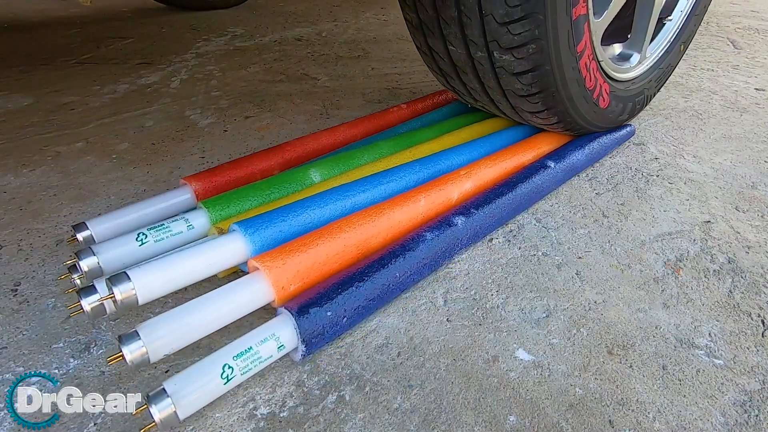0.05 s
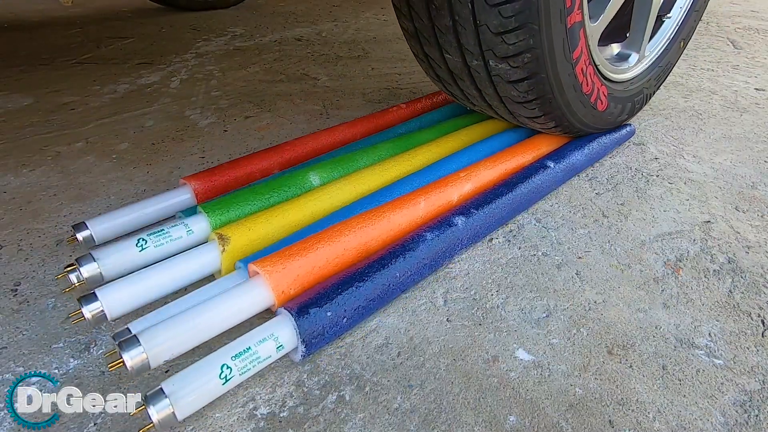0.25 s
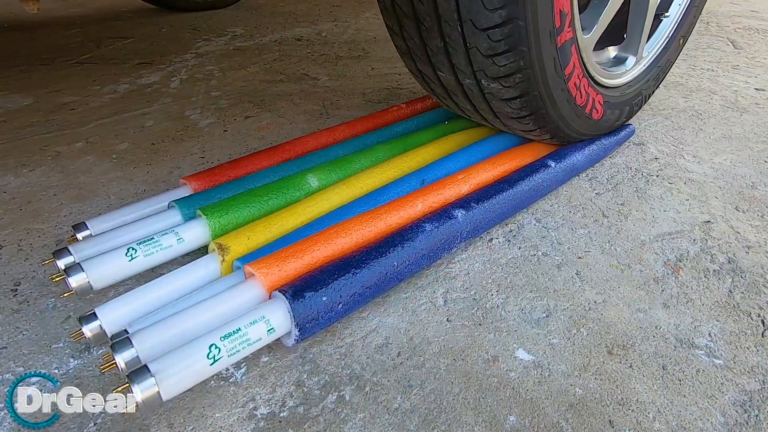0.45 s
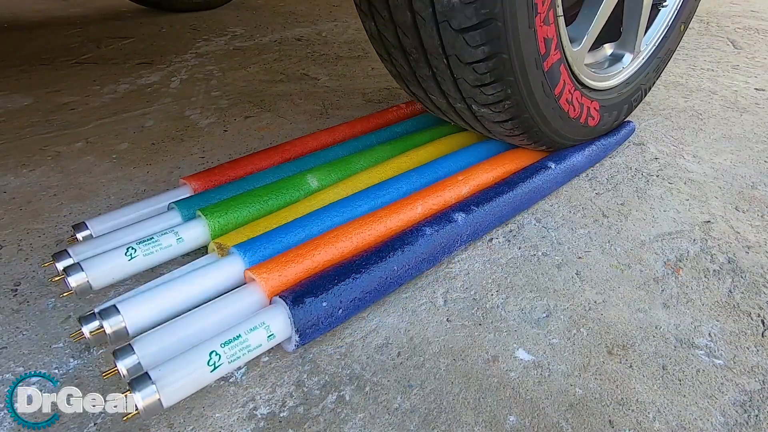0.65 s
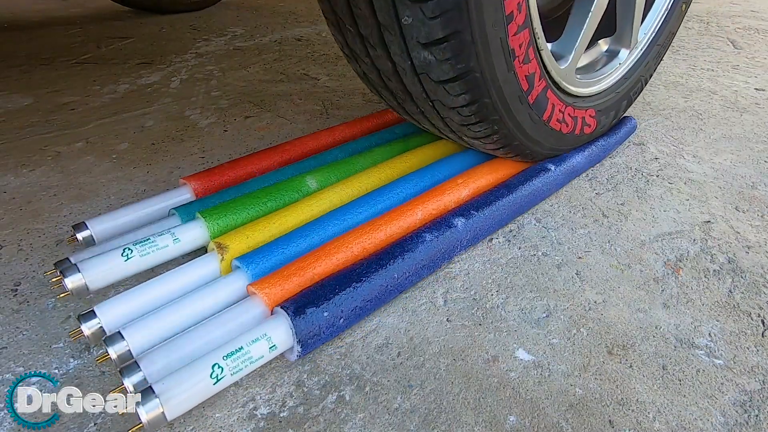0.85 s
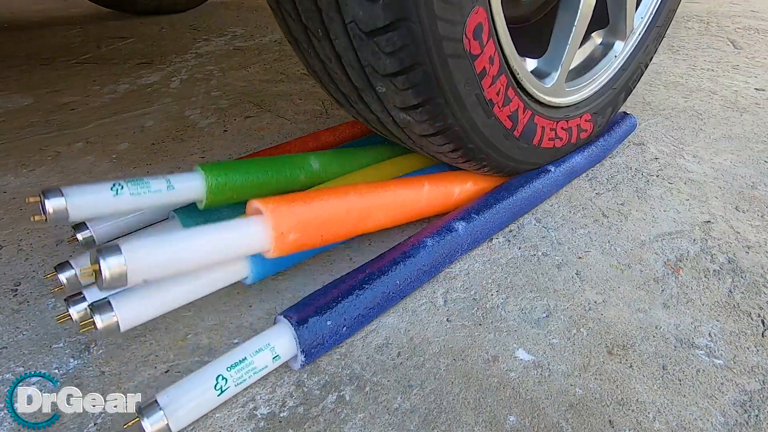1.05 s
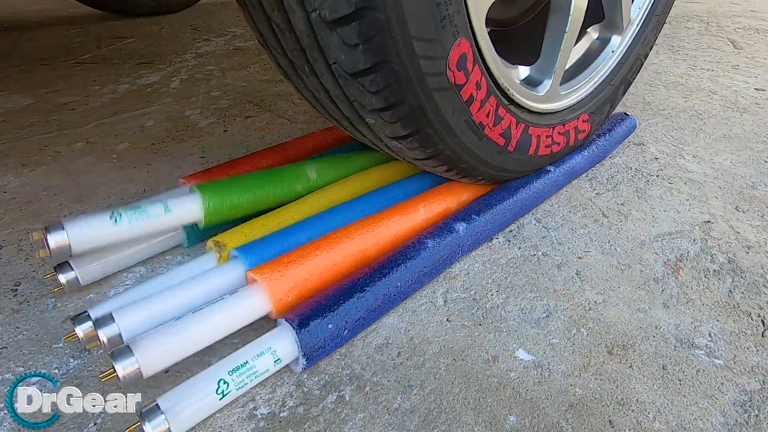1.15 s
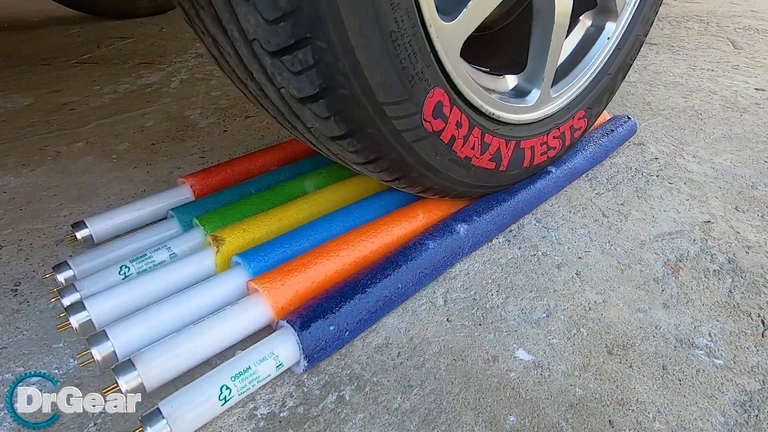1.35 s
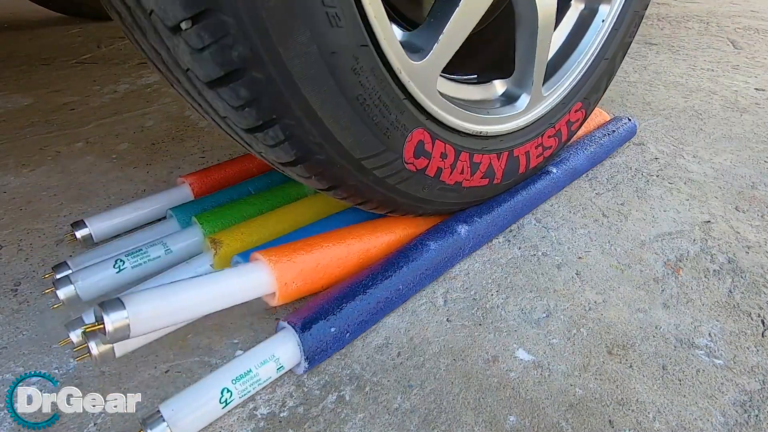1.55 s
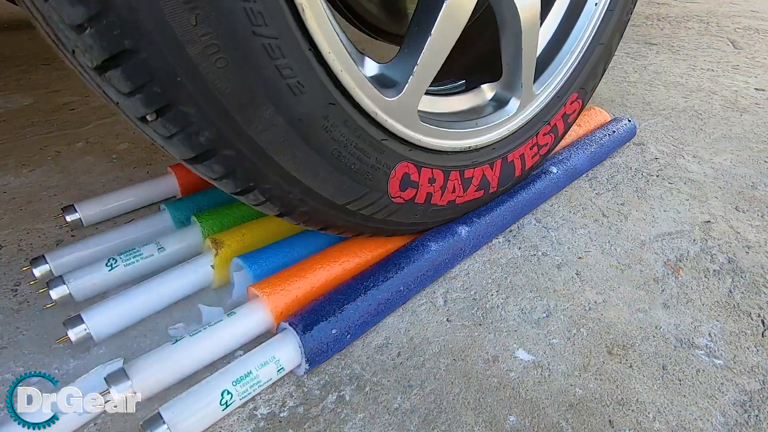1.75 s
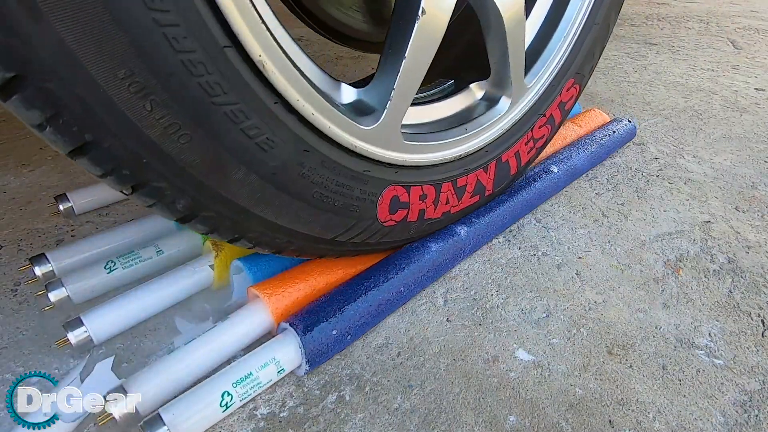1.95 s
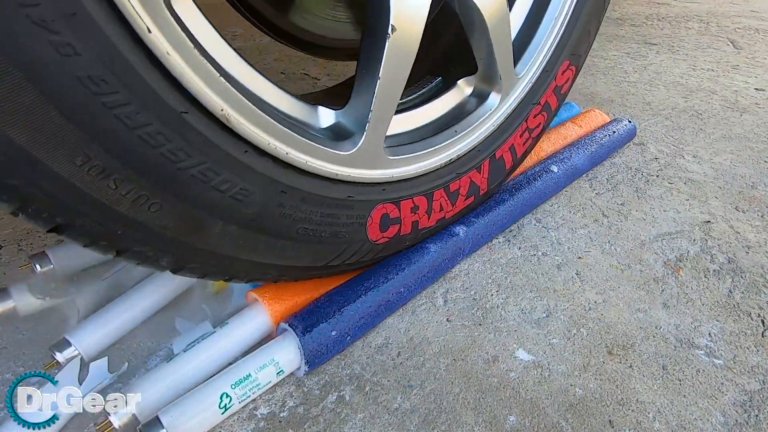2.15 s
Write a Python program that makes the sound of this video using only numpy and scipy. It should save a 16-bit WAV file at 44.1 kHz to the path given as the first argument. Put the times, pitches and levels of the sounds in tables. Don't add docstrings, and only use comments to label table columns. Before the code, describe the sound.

Glass tubes being crushed by a car tyre on concrete, very close and dry. An idling engine hums, then distorted pops burst at 0.2 and 0.4 s with splinters and a hollow tyre hum. Near quiet follows; from 0.75 s, cracks and brief glassy rings thicken into dense crunching, grinding and hollow knocks from 1.0 to 1.65. The loudest burst hits at 1.7, then sparse knocks and ticks until 2.2.

```python
import sys
import numpy as np
from scipy import signal
from scipy.io import wavfile
from scipy.ndimage import uniform_filter1d

SR = 44100
rng = np.random.default_rng(int(sys.argv[2]) if len(sys.argv) > 2 else 0)


def linear_from_db(decibels):
    return 10 ** (np.asarray(decibels, float) / 20)


def output_pcm(signal):
    pcm = np.clip(np.atleast_2d(signal).T, -1, 1) * 32767
    wavfile.write(sys.argv[1], SR, np.round(pcm).astype(np.int16))


N = 97020


def in_time(rows):
    s, *columns = np.transpose(rows)
    return [np.interp(np.arange(N) / SR, s, c) for c in columns]


def coloured(x, points):
    hz, db = np.transpose(points)
    f = np.geomspace(60, SR / 2, 200)
    gain = linear_from_db(np.interp(np.log(f), np.log(hz), db, left=-50, right=-60))
    power = np.r_[0, gain] ** 2 + 1e-7
    taps = signal.minimum_phase(signal.firwin2(1023, np.r_[0, f], power, fs=SR))
    return signal.fftconvolve(x, taps / np.sqrt(np.sum(taps ** 2)))[:len(x)]


def ring(x, hz, t60):
    r, w = linear_from_db(-60 / (t60 * SR)), 2 * np.pi * hz / SR
    return signal.lfilter([0, np.sin(w)], [1, -2 * r * np.cos(w), r * r], x + 1e-18)


def band(x, order, hz, kind):
    return signal.lfilter(*signal.butter(order, hz, kind, fs=SR), x)


def unit(x):
    return x / np.max(np.abs(x))


def add(out, s, x):
    i = int(s * SR)
    out[i:i + len(x)] += x[:len(out) - i]


def splinters(size, spread):
    x = rng.standard_normal(size) * linear_from_db(spread * np.minimum(rng.exponential(1, size), 4))
    return x / np.std(x)


# (time [s], pop level [dB], settled pitch [Hz], suck of air [full scales],
# splinter level [dB])
IMPLOSIONS = [
    (0.2117, 2.5, 624, -1.17, -6),
    (0.3751, -3, 567, -1.07, -5.5),
    (0.3939, -5, 600, 0.62, -7.5),
    (0.4169, -5.5, 620, -0.23, -10.5),
    (1.6901, 4, 900, -1.226, -28),
    (1.6976, -6, 926, 1.33, -29),
    (1.7053, -4, 1025, -1.3, -45),
]
# (time [s], push [full scales])
SLOSH = [
    (1.7021, -0.86),
    (1.704, 0.68),
    (1.7112, 0.9),
]


def implosions():
    t, out, hits = np.arange(SR // 4) / SR, np.zeros(N), np.zeros(N)
    sweep_hz, sweep_s, pop_cycles, suck_s = 900, 0.00085, 4.06, 0.018
    for s, db, hz, suck, _ in IMPLOSIONS:
        turns = hz * t + sweep_hz * sweep_s * (1 - np.exp(-t / sweep_s))
        boom = linear_from_db(-12) * np.sin(2 * np.pi * 327 * t)
        age = t * hz / pop_cycles
        pop = (np.sin(2 * np.pi * turns) + boom) * np.exp(-age ** 2)
        rough = ring(rng.standard_normal(len(t)), 0.96 * hz, 0.0049)
        pop = pop + linear_from_db(-4) * rough / rough.std() * np.exp(-age / 2.06)
        air = suck * (1 - np.exp(-(t / 0.0042) ** 2)) * np.exp(-t / suck_s)
        add(out, s + 0.00034, linear_from_db(db) * pop + air)
        hits[int(s * SR)] = linear_from_db(db - 24.5)
    for s, push in SLOSH:
        add(out, s, push * (1 - np.exp(-(t / 0.0019) ** 2)) * np.exp(-t / suck_s))
    tyre_hz, tyre_t60_s, swell_s = 232.4, 0.45, 0.016
    hum = ring(hits, tyre_hz, tyre_t60_s) - ring(hits, tyre_hz, swell_s * np.log(1000))
    hum = hum * (1 + .5 * np.sin(2 * np.pi * 23 * np.arange(N) / SR))
    rows = [(s, db, 4500) for s, *_, db in IMPLOSIONS]
    return out + cracks(rows) + hum


# (frequency [Hz], level [dB per Hz])
GLASS = [(880, -19), (1500, -2), (1970, -7), (4760, 0), (6430, -4), (10700, -4.5), (15200, -25),
         (16500, -33)]


def cracks(rows):
    t, burst, rings = np.arange(6000) / SR, np.zeros(N), np.zeros(N)
    crack_s, tail_s, tail_db, own_db, own_cycles = 0.0018, 0.013, -16.5, -6, 47
    shard_db, shard_t60_s = -15.5, 0.036
    for s, db, hz in rows:
        lumps = np.repeat(linear_from_db(2.95 * rng.standard_normal(60)), 100)
        fade = np.exp(-t / crack_s) + lumps * linear_from_db(tail_db) * np.exp(-t / tail_s)
        x = splinters(len(t), spread=1.0) * fade
        x *= 1 - np.exp(-t / 0.00052)
        add(burst, s, linear_from_db(db) * band(x, 1, min(3.9 * hz, SR / 2.5), "low"))
        add(rings, s, linear_from_db(db + own_db) * unit(ring(x, hz, own_cycles / hz)))
        chance = rng.random((4, 2))
        for f, d in zip(2200 * 3 ** chance[:, 0], -10 * chance[:, 1]):
            add(rings, s, linear_from_db(db + d + shard_db) * unit(ring(x, f, shard_t60_s)))
    return coloured(burst, GLASS) + rings


# (time [s], level [dB], ringing pitch [Hz])
CRACKS = [(0.744, -16, 5830), (0.7893, -11, 3060), (0.8914, -15, 4530), (0.9291, -24.5, 2700),
          (0.979, -7.5, 5080), (0.9878, -9.5, 2790), (1.0491, -23, 3010), (1.0588, -6.5, 3160),
          (1.0687, -14, 2570), (1.0961, -19, 7200), (1.1076, -5, 5630), (1.1252, -5.5, 9700),
          (1.1357, -6, 2590), (1.1467, -21, 3480), (1.2062, -25, 4240), (1.2179, -9.5, 5940),
          (1.2291, -18, 3220), (1.2562, -18, 4050), (1.2644, -11, 2740), (1.2742, -19, 3500),
          (1.2839, -11.5, 7200), (1.3029, -14.5, 4650), (1.3078, -9, 4730), (1.3342, -7.5, 4100),
          (1.3688, -39, 2810),
          (1.378, -22, 2450), (1.3932, -20, 4430), (1.4031, -25, 4360), (1.4292, -19.5, 4500),
               (1.4473, -14, 4370), (1.461, -18, 4130), (1.468, -18, 2900), (1.4872, -11, 4200),
               (1.5064, -41, 3240), (1.5255, -14.5, 3450), (1.5388, -7, 5570), (1.5781, -9.5, 5100),
               (1.591, -3.5, 5400), (1.5943, -16, 5800), (1.6093, -13, 4870), (1.625, -11, 6070),
               (1.641, -35, 6900), (1.657, -13.5, 3750), (1.6675, -17, 5960), (1.8244, -24, 5070),
               (1.858, -16, 3060), (1.9793, -20.5, 5130), (2.0731, -15, 4600), (2.0946, -16, 3450),
               (2.1471, -17, 5500), (2.1928, -16, 6300)]


def crushed_glass():
    return cracks(CRACKS)


def knocks(rows):
    t, out = np.arange(4000) / SR, np.zeros(N)
    knock_s, cycles, tail_s, tail_db = 0.0016, 5.3, 0.0094, -19
    pressed_s, thud_hz, thud_db = 1.0, 85.5, -23.5
    for s, db, hz in rows:
        fade = 0.31 * np.exp(-t / knock_s) + linear_from_db(tail_db) * np.exp(-t / tail_s)
        x = rng.standard_normal(len(t)) * fade
        x[0] += 3.0
        y = ring(x, hz, cycles / hz) + .5 * ring(x, 1.566 * hz, cycles / hz)
        if pressed_s < s < IMPLOSIONS[-1][0]:
            add(out, s, linear_from_db(db + thud_db) * np.sin(2 * np.pi * thud_hz * t) * np.exp(-t / 0.005))
        add(out, s, linear_from_db(db) * unit(band(y, 2, [0.54 * hz, 2600], "band")))
    return out


# (time [s], level [dB], pitch [Hz])
KNOCKS = [(0.7438, -14.5, 1850), (0.8923, -18.5, 547), (0.9789, -12.5, 774), (1.0253, -21, 830),
          (1.0585, -40, 1040), (1.0688, -11, 850), (1.0965, -13, 796), (1.1075, -9, 1160),
          (1.1148, -6, 1430), (1.1262, -9, 960), (1.1356, -8.5, 870), (1.147, -0.5, 980),
          (1.1897, -24, 750), (1.2291, -9.5, 1050), (1.237, -13, 1050), (1.257, -11, 592.4),
          (1.2685, -9, 980), (1.2761, -15.5, 1000), (1.2839, -12, 700), (1.3007, -11.5, 970),
          (1.3074, -30, 1730), (1.3344, -5.5, 1380), (1.379, -2.5, 1380), (1.3829, -9.5, 630),
          (1.3945, -10.5, 640), (1.4376, -18.5, 674),
          (1.447, -13, 1320), (1.4652, -4, 610), (1.4873, 2.5, 960), (1.4986, -12, 1054),
               (1.51, -20, 910), (1.531, -13, 1570), (1.54, -2, 1130), (1.5748, -17, 800),
               (1.5899, -6.5, 1010), (1.6006, -14, 620), (1.6098, -14.5, 890), (1.6263, -12, 686),
               (1.6442, -8.5, 814), (1.6575, -9.5, 900), (1.7623, -13, 840), (1.8342, -25, 665),
               (1.845, -16, 955), (1.8585, -14, 1440), (1.9689, -15.5, 990), (1.9812, -7.5, 970),
               (2.0005, -18.5, 1050), (2.0737, -10, 1650), (2.0879, -13, 1040), (2.095, -9, 750),
               (2.1466, -4, 1120), (2.1933, -9.5, 672)]
# (time [s], peak level [dB])
MORE_KNOCKS = [
    (0.497, -34.5),
    (0.593, -40),
    (0.694, -31.5),
    (0.789, -27),
    (1.144, -1.5),
    (1.768, -20),
]


def crushed_sleeves():
    settling = np.array([(s, db, 750) for s, db in MORE_KNOCKS])
    return knocks(np.vstack([KNOCKS, settling]))


# (time [s], level [dB])
GRIND = [(.68, -86), (.74, -54), (.85, -57.5), (.9, -47), (1.0, -46.5), (1.18, -39.5), (1.3, -34.5),
         (1.42, -38), (1.62, -38), (1.67, -32), (1.78, -46.5), (1.87, -51), (1.93, -57), (2.0, -54.5),
         (2.06, -46.5), (2.2, -44)]


def grinding():
    db, = in_time(GRIND)
    grains_per_s, grain_s, dull_db = 900, 0.0022, 5.5
    born = rng.random((2, N)) < grains_per_s / SR
    born = born * linear_from_db(4.84 * np.minimum(rng.exponential(1, (2, N)), 4))
    dying = signal.lfilter([1], [1, -np.exp(-1 / (grain_s * SR))], born) * rng.standard_normal((2, N))
    bright = coloured(dying[0], GLASS)
    dull = ring(np.diff(dying[1], prepend=0), 1000, 0.0024)
    return linear_from_db(db) * (bright / bright.std() + linear_from_db(dull_db) * dull / dull.std())


# (time [s], level [dB], which tube [0 first, 1 second])
WHOLE_HITS = [
    (0.744, -26.5, 0),
    (0.765, -30.5, 0),
    (0.7885, -30.5, 1),
    (0.8905, -22, 1),
    (0.929, -32, 1),
    (0.959, -37, 1),
    (0.989, -29, 1),
    (1.027, -26, 1),
    (1.0587, -19, 1),
]
# (frequency [Hz], level [dB], time to fall 60 dB [s], held to 0.075 s at
FIRST_TUBE = [(1900, -5, 0.32), (2500, -5.5, 0.39), (2810, -11, 0.071), (3250, -8, 0.29), (3640, -1, 0.096),
              (3960, -10.5, 0.33), (4947, -24, 0.63)]
SECOND_TUBE = [(2340, -4.5, 0.21), (2630, -13, 5.0), (3060, -8.5, 0.13), (3930, -16, 0.14),
               (4410, -1.5, 0.32), (5600, -28, 0.094), (5530, -3, 0.23)]


def whole_tubes():
    t, out = np.arange(6000) / SR, np.zeros(N)
    longest_t60_s, detune_db = .075, .15
    for s, db, tube in WHOLE_HITS:
        for hz, d, t60 in (SECOND_TUBE if tube > .5 else FIRST_TUBE):
            x = rng.standard_normal(len(t)) * (np.exp(-t / 0.0033) + 0.064 * np.exp(-t / 0.014))
            hz = hz * linear_from_db(detune_db * rng.standard_normal())
            level = linear_from_db(db + d + 1.4 * rng.standard_normal())
            add(out, s, level * unit(ring(x, hz, min(t60, longest_t60_s))))
    return out


# (time [s], level [dB], pitch [Hz])
EXTRA_KNOCKS = [(0.345, -35.5, 727), (0.582, -49, 1440), (0.707, -34, 900), (0.765, -26.5, 850),
                (0.947, -26, 698.5), (1.3305, -10, 560), (1.3105, -10.5, 1700), (1.355, -35, 1630),
                (1.47, -22, 800), (1.81, -25.5, 938), (1.883, -21, 850), (1.901, -35, 1000), (2.011, -24, 1020),
                (2.047, -33, 830), (2.146, -18, 454), (2.189, -16, 1050)]


def extra_knocks():
    return knocks(EXTRA_KNOCKS)


# (time [s], level [dB], ringing pitch [Hz])
MORE_CRACKS = [(0.0488, -38, 4920), (0.0957, -36.5, 5360), (0.134, -42, 10500), (0.176, -36.5, 9230),
               (0.2733, -33.5, 9400), (0.2937, -41, 5630), (0.3426, -39.5, 8500), (0.4663, -34, 5610),
               (0.96, -27, 2660), (1.026, -29, 2930), (1.1891, -26, 3270), (1.3305, -10.5, 3050),
               (1.5295, -13, 4000), (1.5745, -18, 4840), (1.6875, -16.5, 4440), (1.7438, -40, 2570),
               (1.7956, -33, 5130), (1.8096, -36, 5300), (1.843, -24.5, 3820), (1.9388, -36.5, 5100),
               (1.9528, -36, 5026), (1.9702, -23, 5300), (2.0111, -30.5, 4290), (2.0356, -38, 4500),
               (2.0451, -28, 4156), (2.066, -42, 4460), (2.135, -25, 5075), (2.188, -29, 4940)]


def more_cracks():
    return cracks(MORE_CRACKS)


def debris():
    t, out = np.arange(SR // 4) / SR, np.zeros(N)
    for s, *_, db in IMPLOSIONS:
        rain = splinters(len(t), spread=1.5) * np.exp(-(t / 0.082) ** 2)
        gusts = np.repeat(linear_from_db(4.0 * rng.standard_normal(len(t) // 200 + 1)), 200)[:len(t)]
        add(out, s, linear_from_db(db - 38) * rain * gusts)
    return band(coloured(out, GLASS), 1, 3500, "high")


# (time [s], firing rate [Hz], level [dB], lift of the lowest order [dB])
ENGINE = [
    (0, 39.7, -25.5, -7),
    (.15, 37.37, -29.5, -2),
    (.205, 38.7, -29, -5),
    (.25, 37.2, -48.5, 6),
    (.35, 37.3, -40.5, 2.5),
    (.55, 40.04, -53, 4.5),
    (1.0, 37.9, -50, 8),
    (1.5, 36.5, -44.5, 12.5),
    (2.2, 35.5, -52.5, 14),
]
# (multiple of the firing rate, level [dB])
ORDER_DB = [(1, -6), (2, -9), (3, -21), (4, -1.5), (5, -14), (6, -19), (7, -6)]
# (frequency [Hz], level [dB per Hz])
CLATTER = [(180, -26.5), (300, -11), (430, -20.5), (560, -7), (900, -9), (1170, -20), (16000, -39)]


def engine():
    hz, db, lift_db = in_time(ENGINE)
    turns = np.cumsum(hz) / SR
    waver = uniform_filter1d(rng.standard_normal((len(ORDER_DB), N)), 2000) * 100
    hum = np.zeros(N)
    for (k, d), w in zip(ORDER_DB, waver):
        lift = lift_db if k < 1.5 else 0
        hum += linear_from_db(d + w + lift) * np.sin(2 * np.pi * (k * turns + rng.random()))
    clatter = coloured(rng.standard_normal(N), CLATTER) * (1 + 0.31 * np.sin(6 * np.pi * turns))
    return linear_from_db(db) * (hum + linear_from_db(-10.5) * clatter)


def ducking():
    t, db = np.arange(N) / SR, np.zeros(N)
    duck_db, duck_s = -11, .018
    times = np.transpose(IMPLOSIONS)[0]
    for s in times:
        if np.any(np.abs(s - .02 - times) < .015):
            continue
        db += duck_db * np.clip(4 * (1 - (s - t) / duck_s), 0, 1) * (t < s)
    return linear_from_db(db)


def scene():
    ducked = crushed_glass() + crushed_sleeves() + grinding() + debris() + engine()
    mid = implosions() + ducking() * ducked
    mid = mid + more_cracks() + extra_knocks() + whole_tubes()
    smear = mid * 10 * uniform_filter1d(rng.standard_normal(N), 100)
    side = linear_from_db(-16.5) * (band(smear, 1, 12000, "high") + linear_from_db(-27) * smear)
    return np.array([mid + side, mid - side])


def roll_off(x):
    return signal.sosfilt(signal.butter(12, 16800, fs=SR, output="sos"), x)


def record(dry):
    clip_top = .88
    clipped = dry / (1 + np.abs(dry / clip_top) ** 6) ** (1 / 6)
    coupled = band(clipped, 1, 1.0, "high")
    limited = signal.sosfilt(signal.cheby2(10, 60, 16900, fs=SR, output="sos"), coupled)
    return roll_off(limited)


dry = scene()
out = record(dry)
output_pcm(out)
```